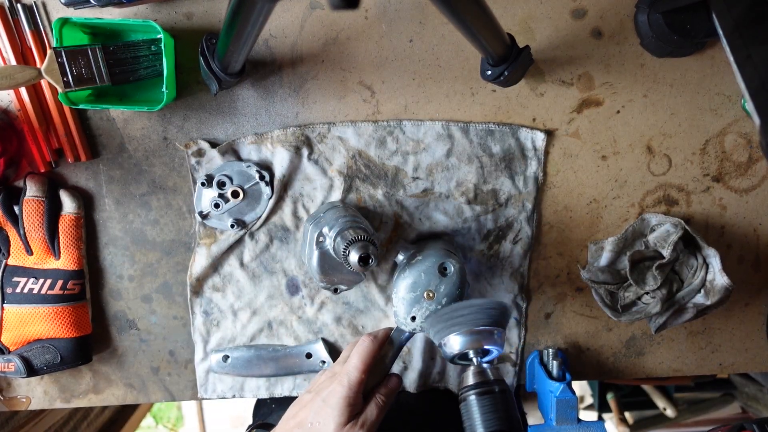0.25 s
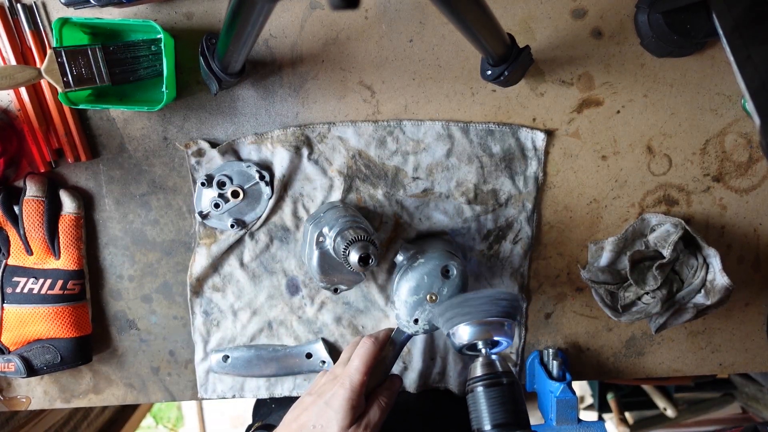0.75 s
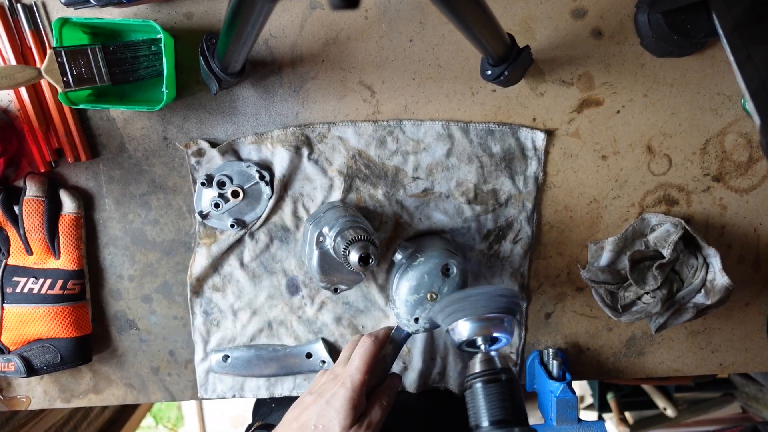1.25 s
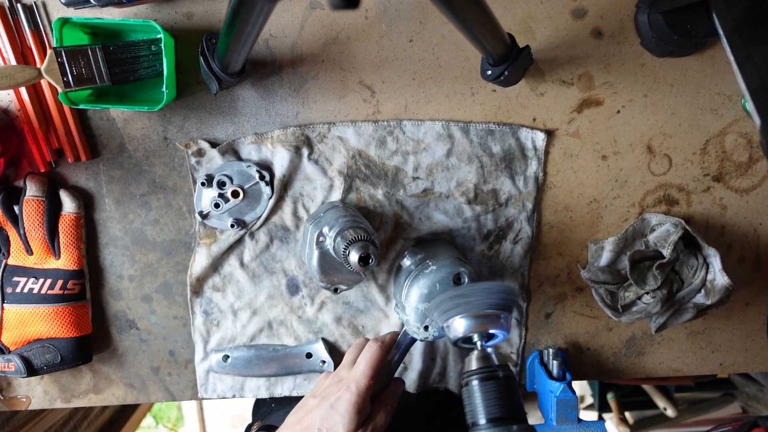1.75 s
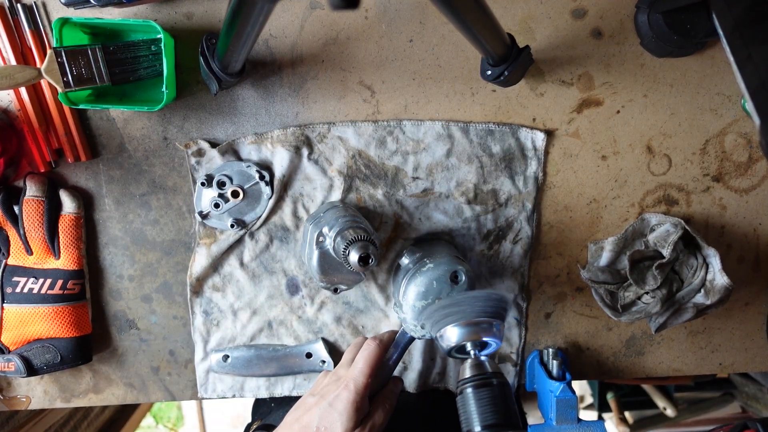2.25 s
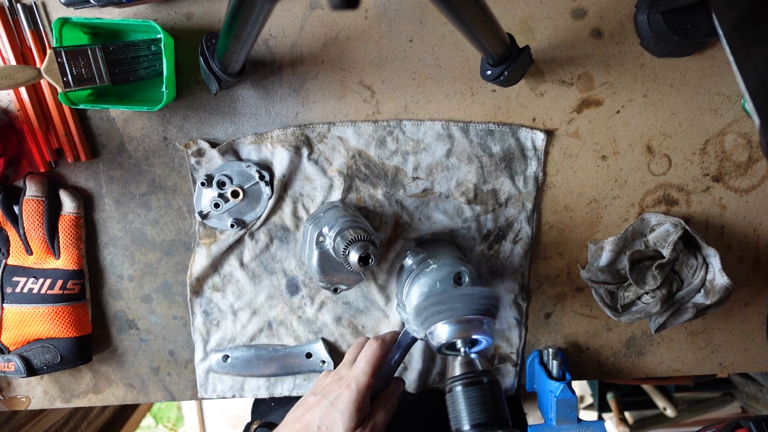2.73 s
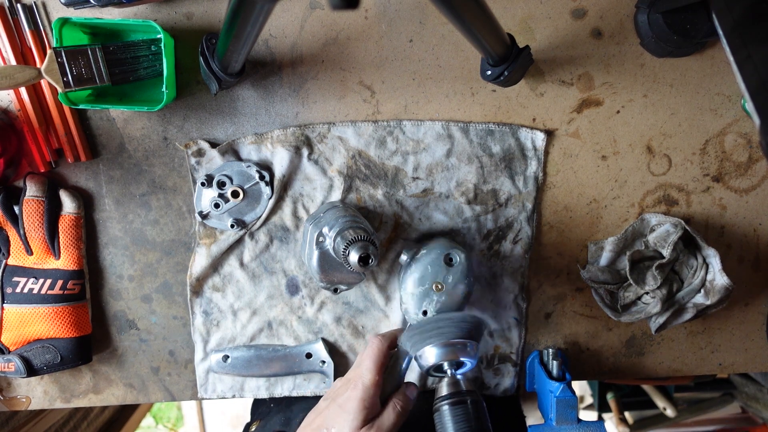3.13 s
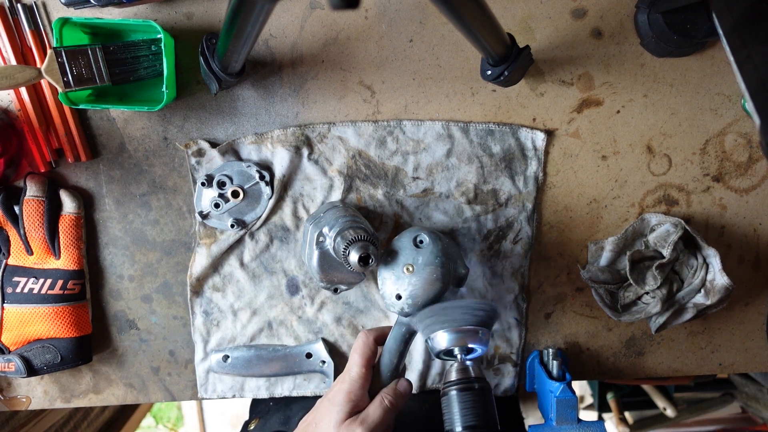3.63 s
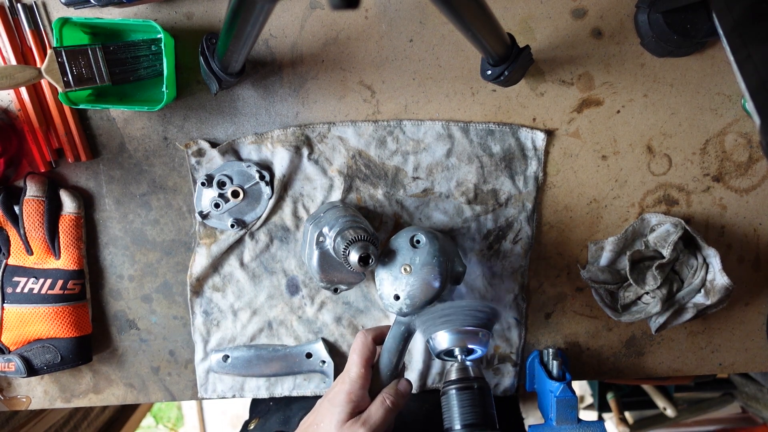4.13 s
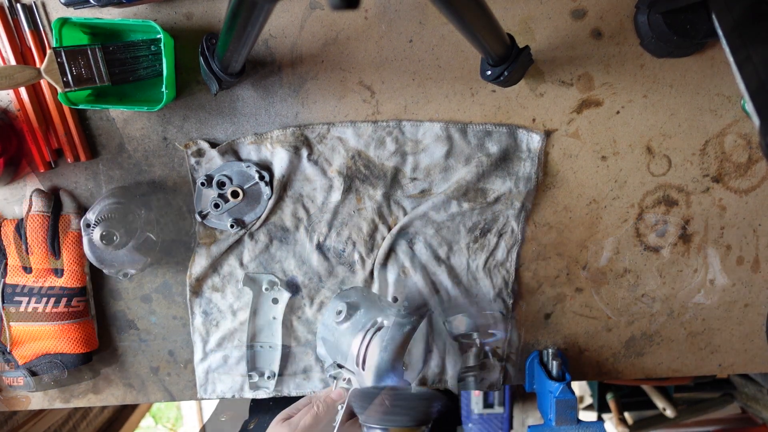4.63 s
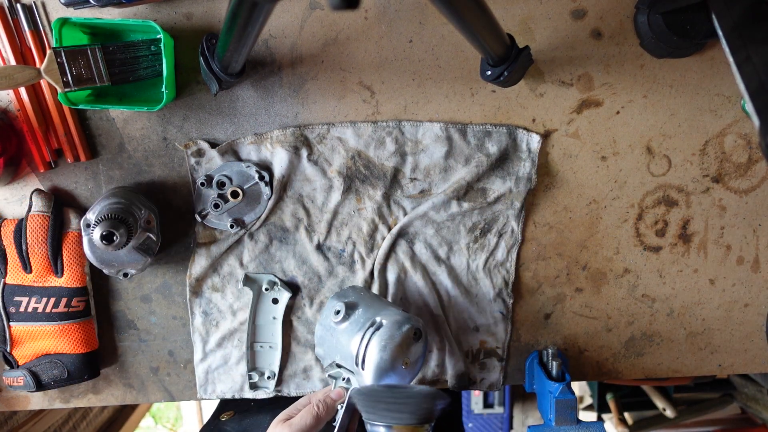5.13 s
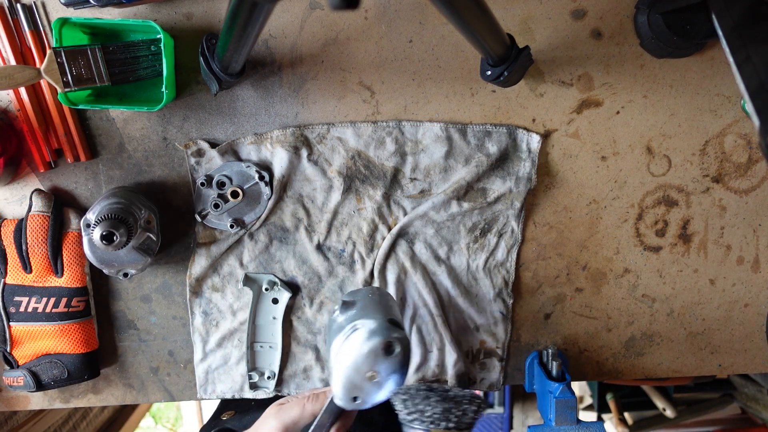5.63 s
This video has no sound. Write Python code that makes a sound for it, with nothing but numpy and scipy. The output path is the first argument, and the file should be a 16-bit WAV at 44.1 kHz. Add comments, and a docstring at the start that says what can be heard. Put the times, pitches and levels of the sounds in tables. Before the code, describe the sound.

Bright wire-brush hiss over a high drill whine, stuttering low knocks underneath, a smoother stretch, then a braked stop and near silence.

```python
"""A cordless drill spins a wire cup brush against a hand-held metal casing on a cloth-covered bench.
From the start the wires hiss, motor and gears whine, and short runs of knocks come once a brush turn.
Past four seconds a hard press makes the whine sag; then comes a cut to a stretch without knocks or rumble.
Last the trigger is let go, the brake squeals and clacks, and the hiss fades out.
Wires are filtered noise, whines and squeal are sines, and knocks are clicks that set the bench ringing."""
import sys
import numpy as np
from scipy import signal
from scipy.fft import rfft, irfft
from scipy.io import wavfile
from scipy.ndimage import uniform_filter1d

SR = 44100
rng = np.random.default_rng(int(sys.argv[2]) if len(sys.argv) > 2 else 0)


def pcm_store(signal):
    """Save signal as 16-bit PCM."""
    levels = np.round(np.clip(np.atleast_2d(signal), -1, 1) * 32767)
    wavfile.write(sys.argv[1], SR, levels.astype(np.int16).T)


N = 259308   # length in samples


def amp(db):
    """Turn a level in dB into a plain multiplier."""
    return 10 ** (np.asarray(db) / 20)


def rms_one(x):
    """Scale a sound to an average strength (rms) of 1."""
    return x / np.sqrt(np.mean(x ** 2) + 1e-20)


def seconds():
    """The time of every sample, in seconds."""
    return np.arange(N) / SR


def in_time(rows):
    """Draw each column of a table as a line over time, one value per sample."""
    s, *columns = np.transpose(rows)
    return [np.interp(seconds(), s, column) for column in columns]


def at_hz(points, hz):
    """Read a spectrum between its points, on a log-frequency axis."""
    point_hz, point_db = np.array(points)[:, 0], np.array(points)[:, 1]
    return np.interp(np.log(hz + 1), np.log(point_hz), point_db)


def drift(rate_hz):
    """Random wandering of rms 1: noise smoothed to about this rate."""
    step = 40   # samples between the random points
    r = np.exp(-2 * np.pi * rate_hz * step / SR)
    noise = rng.standard_normal(N // step + 2002)
    slow = signal.lfilter([1], [1, -2 * r, r * r], noise)[2000:]   # skip the settling
    return np.interp(np.arange(N) / step, np.arange(len(slow)), rms_one(slow))


def ring(clicks, hz, t60):
    """Each click starts a sine that dies by 60 dB in t60 seconds; a click of 1 gives height 1."""
    r, w = amp(-60 / (t60 * SR)), 2 * np.pi * hz / SR
    return signal.lfilter([0, np.sin(w)], [1, -2 * r * np.cos(w), r * r], clicks + 1e-18)


def sine(hz):
    """A sine of rms 1 whose pitch may glide."""
    return np.sqrt(2) * np.sin(2 * np.pi * np.cumsum(hz) / SR)


def high(x, hz):
    """Steeply remove everything below a frequency."""
    return signal.sosfilt(signal.butter(3, hz, "high", fs=SR, output="sos"), x)


# runs of knocks, one knock a brush turn; also read by knocks():
# (first knock [s], end [s], first level [dB], last level [dB], every second knock weaker by [dB],
#  upper over lower bench tones [dB])
KNOCK_RUNS = [(0.043, 0.11, -60, -54, 5, 0), (0.12, 0.225, -48, -55, 2, 4),
              (0.233, 0.309, -48.5, -54.5, 17, 3.5), (0.388, 0.4, -59, -63, 0, 1),
              (0.408, 0.522, -46, -59, -6.5, 4), (0.653, 0.748, -61.5, -67.5, -8, -6),
              (0.794, 0.825, -69, -52.5, -5, -4), (0.831, 1.03, -45.5, -47, -4, 4.5),
              (1.039, 1.107, -43.5, -54, 1.5, 0), (1.192, 1.26, -56, -52, 0, 0),
              (1.27, 1.355, -49, -49, 4, 1), (1.365, 1.478, -40, -52, 12, 4),
              (1.481, 1.507, -48.5, -46, 1, 0), (1.515, 1.64, -39.5, -52.5, -1.5, 4.5),
              (1.651, 1.795, -49.5, -44.5, 2, -2.5), (1.806, 1.89, -57, -52, 2, -7),
              (1.899, 1.95, -40.5, -49, 4, 3.5), (1.959, 2.005, -45.5, -50, 2, 2),
              (2.016, 2.085, -50, -49, 0, 2), (2.094, 2.2, -45, -50, -0.5, 8),
              (2.209, 2.28, -46, -50, -1, 2), (2.286, 2.355, -46.5, -52, 0, 7.5),
              (2.362, 2.43, -43, -45.5, -3, 1), (2.44, 2.565, -50, -50, -0.5, 1),
              (2.574, 2.625, -44.5, -53, -2, 0), (2.634, 2.7, -50, -53, 2.5, 8),
              (2.711, 2.87, -52.5, -57.5, -1, 2), (2.885, 2.94, -52, -59, 8, -3),
              (2.951, 3.114, -53.5, -54, 11, 4), (3.127, 3.16, -51, -62, 0, -5),
              (3.171, 3.355, -70, -60, 1.5, 1), (3.366, 3.39, -53, -68, -1, 0),
              (3.401, 3.5, -50, -58, 18, 4.5), (3.517, 3.68, -68, -65, -1.5, 0),
              (3.692, 3.78, -56, -63, -1.5, -0.5), (3.79, 3.89, -73, -60.5, -2, 6),
              (3.907, 3.97, -57, -58, -0.5, -2), (3.98, 4.1, -54, -69, 1, 4),
              (4.116, 4.16, -55, -67, -2, 0), (4.167, 4.2, -57, -60, -3, 1),
              (4.212, 4.3, -52.5, -66, 0, -1), (4.315, 4.555, -66.5, -60.5, -7.5, 1)]
IDLE_DB = -85   # pressure on the bench between runs


def pressure_db():
    """How hard the casing bears on the bench: the level of the knock runs, smoothed."""
    now, out = seconds(), np.full(N, float(IDLE_DB))
    for start, end, first_db, last_db, *_ in KNOCK_RUNS:
        inside = (now >= start) & (now < end + .02)
        out[inside] = np.interp(now[inside], [start, end], [first_db, last_db])
    return uniform_filter1d(out, size=1500)


# tone of the bench rumble, before scaling: (frequency [Hz], level per Hz [dB])
RUMBLE = [(24, -56), (40, -14), (86, -21.5), (161, -3.5), (408, -8.5), (484, 3), (600, -19.5), (780, -39.5),
          (1320, -120)]
RUMBLE_DB = -73.5   # at a pressure of -62 dB and a hiss of -35.5 dB


def rumble():
    """Low noise from the bench, rising with the knocking, nearly gone after the cut at 4.56 s."""
    spectrum = rfft(rng.standard_normal(N)) * amp(at_hz(RUMBLE, np.fft.rfftfreq(N, 1 / SR)))
    noise = rms_one(irfft(spectrum, N))
    level_db = RUMBLE_DB + 0.27 * (pressure_db() + 62) + 1.4 * drift(7.4)
    before_cut = np.clip((STRETCH_STARTS[4] - seconds()) / 0.025, .03, 1)
    follows_hiss = amp(in_time(SCRUB)[0] + 35.5)
    return noise * amp(level_db) * before_cut * follows_hiss


# falling brake squeal: (time [s], pitch [Hz], level [dB], level one octave up [dB])
SQUEAL = [(5.538, 2600, -60, -80), (5.546, 2480, -46, -56), (5.551, 2380, -39, -39),
          (5.558, 2260, -37, -46), (5.562, 2120, -46, -60), (5.568, 1930, -40, -65),
          (5.574, 1800, -60, -80)]
# sharp clacks of the chuck: (time [s], peak level [dB], pitch [Hz])
CLACKS = [(4.546, -26, 8000), (5.55, -29, 5000), (5.577, -30, 7000), (5.583, -28, 9000), (5.588, -28, 8000),
          (5.5995, -24, 6200)]
BRAKED_HUM_DB = -71.5


def brake():
    """A rough falling squeal with its octave, sharp chuck clacks, and a hum as the motor runs down."""
    silent_start, silent_end = (0.023, 2606, -150, -150), (5.6, 1800, -150, -150)
    hz, db, octave_db = in_time([silent_start] + SQUEAL + [silent_end])
    hz = hz * (1 + .025 * drift(250))   # fast random pitch makes it rough
    squeal = amp(db) * sine(hz) + amp(octave_db) * sine(2 * hz)
    squeal = squeal * amp(3 * drift(250))
    clacks = np.zeros(N)
    for s, peak_db, clack_hz in CLACKS:
        burst = rng.standard_normal(300) * np.exp(-np.arange(300) / 20)
        burst = ring(burst, clack_hz, 0.0032) + .5 * ring(burst, 0.89 * clack_hz, .003) + .8 * burst
        clacks[round(s * SR):][:300] += amp(peak_db) * burst / np.abs(burst).max()
    # the motor's own turn sounds at a quarter of the squeal's pitch
    hum_on = np.interp(seconds(), [5.514, 5.52, 5.562, 5.568], [0, 1, 1, 0])
    hum = amp(BRAKED_HUM_DB) * sine(hz / 4) * hum_on
    return high(squeal + clacks, 1200) + hum


# motor; its speed also turns the brush in scene():
# (time [s], speed [turns per s], level of the 4th, 8th and 13th multiple [dB])
MOTOR = [(0.0, 676, -51, -52, -59), (0.15, 673.3, -51, -53, -60), (0.6, 675, -51, -53, -55),
         (1.2, 674.2, -51, -52, -53), (1.62, 675, -51, -52, -49), (2.12, 672, -51, -53, -48),
         (2.4, 672.3, -52, -53, -51), (2.55, 674.6, -52, -53, -50), (3.1, 675.8, -53, -55, -53),
         (3.45, 676, -53, -55, -56), (3.75, 672.4, -55, -56, -49), (4.0, 672, -56, -57, -49),
         (4.16, 672.5, -53, -55, -46), (4.2, 637.8, -53, -57, -44), (4.23, 631, -53, -59, -43),
         (4.36, 630.8, -53, -66, -44), (4.5, 631.5, -53, -64, -46), (4.575, 680.8, -52, -60, -49),
         (4.92, 677.2, -51, -58, -48), (5.14, 673.6, -53, -61, -46), (5.3, 676, -53, -62, -45),
         (5.51, 676.5, -53, -60, -46)]
# weak whines: (multiple of the motor speed, level [dB], heard from [s], heard to [s])
FAINT_WHINES = [(1, -76, 3, 4.6), (1, -74, 4.55, 5.6), (2, -74.5, 2.5, 4.5), (3, -65.5, 3, 4.9),
                (16, -62.5, -6, 5.4), (16, -58, 1.5, 2.95)]


def whine(turns, waver, beat_depth):
    """Motor and gears: sines on multiples of the motor speed, the main ones beating once a brush turn."""
    speed, *levels = in_time(MOTOR)
    speed = speed * (1 + waver * drift(15.4))
    now = seconds()
    beat = 1 + beat_depth * np.cos(2 * np.pi * turns + 2.0)
    flutter = amp(.8 * drift(20))
    out = np.zeros(N)
    for multiple, db in zip((4, 8, 13), levels):
        out += amp(db) * flutter * sine(multiple * speed) * beat
    for multiple, db, start, end in FAINT_WHINES:
        heard = np.clip(np.minimum(now - start, end - now) / 0.066, 0, 1)   # fades in and out
        out += amp(db + 1.6 * drift(12)) * sine(round(multiple) * speed) * heard
    powered = np.clip((5.52 - now) / 0.013, 0, 1)   # the trigger is let go
    return out * powered


# tones of bench and casing under a knock: (frequency [Hz], level [dB], ring time t60 before damping [s])
BENCH = [(162, -24, 0.06), (250.5, -2.5, 0.046), (295.4, 1.5, 0.03), (480, 1, 0.06), (513.4, -1, 0.041),
         (652, -14, 0.11), (810, -10.5, .045), (1105, -5.5, .035)]
SHARPEN_PER_DB, MID_KNOCK_DB = .5, -54   # a harder knock is a shorter, brighter contact
UNEVEN_DB = 1.6   # random spread from knock to knock


def knocks(turns, uneven_db, soft_hz):
    """The off-centre brush knocks the casing on the bench once a turn; each click rings the bench tones."""
    rows = []
    for start, end, first_db, last_db, skip_db, hollow_db in KNOCK_RUNS:
        first, last = round(start * SR), round(end * SR)
        nth = np.arange(np.floor(turns[last] - turns[first]) + 1)
        at = np.searchsorted(turns, turns[first] + nth)   # sample of each whole turn
        level_db = np.interp(at, [first, at[-1] + 1], [first_db, last_db]) - skip_db * (nth % 2)
        rows += zip(at, level_db, nth * 0 + hollow_db)
    at, level_db, hollow_db = np.transpose(rows)
    at = at.astype(int)
    late = rng.integers(0, 40, N)[at]   # contact comes up to 39 samples late
    strength_db = level_db + rng.normal(0, uneven_db, N)[at]
    chance_db = rng.normal(0, UNEVEN_DB, (N, len(BENCH)))[at]   # separate for each tone
    edge_hz = soft_hz * amp(SHARPEN_PER_DB * (strength_db - MID_KNOCK_DB))
    out = np.zeros(N)
    for k, (hz, db, t60) in enumerate(BENCH):
        tilt = .5 if hz > 400 else -.5   # a hollow knock favours the upper tones
        clicks = np.zeros(N)
        click_db = strength_db + tilt * hollow_db + chance_db[:, k]
        clicks[at + late] = amp(click_db) / (1 + (hz / edge_hz) ** 2)
        damped_t60 = min(t60, .08)   # the cloth damps long ringing
        out += amp(db) * ring(clicks, hz, damped_t60) * (-1) ** k   # neighbours start in opposite directions
    return high(out, 170)


# wires on metal; also read by rumble(): (time [s], level [dB])
SCRUB = [(0, -34), (2.65, -35.5), (4.53, -34.5), (4.58, -34.5), (5.53, -34.5), (5.6, -35), (5.62, -48),
         (5.64, -71.5), (5.67, -87), (5.78, -94), (5.88, -98.5)]
# five stretches of scrubbing, some joined by cuts, each with its own hiss tone,
# then the last hiss as it fades out; also read by rumble(): (start [s])
STRETCH_STARTS = (0, .56, 2.95, 3.55, 4.56, 5.635)
# tone of the hiss in each stretch, before scaling: (frequency [Hz], level per Hz [dB])
STRETCH_COLOURS = [
    [(350, -57.5), (600, -28.5), (669, -20.5), (1200, -7), (1460, -8), (1630, -5), (2550, -5), (2700, -4.5),
     (2930, -3.5), (4290, -7), (5340, -4.5), (9470, -0.5), (11500, 1), (15700, -0.5)],
    [(350, -50.5), (600, -19), (942, -18), (1090, -11), (2380, -6), (2550, -8.5), (2730, -5.5),
     (2930, -6.5), (3690, -6.5), (4230, -9), (5340, -6), (6820, -5.5), (11800, 0.5), (15700, -3.5)],
    [(350, -56), (600, -23), (929, -15), (1060, -8), (2550, -5.5), (2730, -1.5), (2930, -5), (3740, -3.5),
     (4230, -6), (5340, -5), (7010, -3.5), (11600, 2), (14700, -1.5), (15700, -4.5)],
    [(350, -64), (600, -26), (916, -19.5), (1090, -12), (1600, -10.5), (1920, -12.5), (2590, -7),
     (4720, -11), (6370, -8), (7720, -7), (8490, -2), (9340, -6.5), (12300, -2), (15700, -7)],
    [(120, -90), (200, -58), (632, -27.5), (667, -26), (961, -22.5), (1310, -9), (1520, -16.5), (2150, -8),
     (2620, -8), (3090, -10.5), (7160, -8.5), (9080, -6), (9590, -8), (13300, -5), (15700, -4)],
    [(120, -33), (200, -4), (1520, 5), (1600, 0), (1850, 2), (2190, 1), (2930, -1), (15700, -5)],
]
# two bands lifted in each stretch: (frequency [Hz], width [Hz], lift [dB])
STRETCH_BRIGHT = [
    [(11500, 900, 3.5), (13000, 520, 3.5)],
    [(10600, 560, 1.5), (15000, 800, 1.5)],
    [(13900, 3800, 3.5), (11400, 900, 1)],
    [(12150, 1400, 3.5), (9940, 380, 4)],
    [(13100, 1300, 3.5), (10740, 500, 3)],
    [(2500, 1600, 3), (9050, 1800, 1.5)],
]
# ringing of casing and cup under the wires: (frequency [Hz], width [Hz], level over the hiss [dB])
CASING = [(1078, 72, 4), (1332, 62, 3), (1631, 25, 5.5), (2000, 87, -1), (2390, 130, 6), (2800, 60, 3),
          (2910, 80, 5), (3250, 120, 6), (3600, 90, 7), (3830, 110, 6), (4040, 80, 4.5), (4490, 90, 5),
          (4780, 200, 5), (5230, 120, 5), (5500, 100, 3.5), (5940, 240, 6), (6326, 220, 5), (6590, 160, 4),
          (7600, 200, 2.5), (10300, 180, 2.5), (11230, 93, 2.5)]
# tone of the reflected hiss, before scaling: (frequency [Hz], level per Hz [dB])
SIDE_COLOUR = [(300, -60.5), (600, -40.5), (1120, -39), (1900, -13.5), (2450, -2), (3500, -2), (4060, -2),
               (4440, -7), (8460, 3.5), (9240, 3), (11900, 3.5), (15700, 1.5)]
SIDE_DB = -13   # reflected hiss against the level in SCRUB
BODY_HZ, BODY_FOLLOWS = 1600, .12   # the hiss below this swells with the pressure, dB per dB


def wires(turns, grain_db, wobble_db):
    """Dense uneven scratches, pressed harder once a turn, ring the casing; gives direct and reflected hiss."""
    uneven_db = grain_db * drift(300) + 0.28 * drift(5.2) + 0.49 * drift(11)
    angle = 2 * np.pi * turns
    press = np.cos(angle) + .6 * np.cos(2 * angle) + 0.54 * np.cos(3 * angle)
    scratches = rng.standard_normal((2, N)) * amp(uneven_db) * amp(wobble_db * press)
    hz = np.fft.rfftfreq(N, 1 / SR)
    rings_db = sum(db / (1 + (2 * (hz - f) / width) ** 2) for f, width, db in CASING)
    direct, reflected = rfft(scratches) * amp([rings_db, .5 * rings_db + at_hz(SIDE_COLOUR, hz)])

    stretch = np.searchsorted(STRETCH_STARTS, seconds(), "right") - 1
    out = np.zeros(N)
    for k, (colour, bands) in enumerate(zip(STRETCH_COLOURS, STRETCH_BRIGHT)):
        lift_db = sum(db * np.exp(-(2 * (hz - f) / width) ** 4) for f, width, db in bands)
        heard = rms_one(irfft(direct * amp(at_hz(colour, hz) + lift_db), N))
        # a short crossfade joins the stretches
        out += heard * uniform_filter1d((stretch == k) * 1., size=900, mode="nearest")

    body = signal.sosfilt(signal.butter(2, BODY_HZ, fs=SR, output="sos"), out)
    before_cut = seconds() < STRETCH_STARTS[4]   # the body follows the pressure until that cut
    out += body * (amp(BODY_FOLLOWS * (pressure_db() + 58) * before_cut) - 1)
    level = amp(in_time(SCRUB)[0])
    return out * level, rms_one(irfft(reflected, N)) * level * amp(SIDE_DB)


# sideways lean of the treble: (time [s], left minus right [dB])
LEAN = [(0.0, 1.0), (1.56, 1.0), (4.41, 0.5), (4.96, -0.5), (5.6, -0.5)]
GEAR_RATIO = 12.94   # motor turns per brush turn
FIRST_TURN = -0.42   # where in its turn the brush starts, in turns


def scene():
    """All sources sit close to the middle in stereo, the treble hiss leaning a little to one side."""
    turns = FIRST_TURN + np.cumsum(in_time(MOTOR)[0]) / GEAR_RATIO / SR
    hiss, side = wires(turns, grain_db=0.9, wobble_db=0.43)
    drill = whine(turns, waver=.0005, beat_depth=.3) + brake()
    bench = knocks(turns, uneven_db=UNEVEN_DB, soft_hz=1100)
    # side is added on the left and taken away on the right
    side = side + high(hiss, 3500) * np.tanh(in_time(LEAN)[0] * np.log(10) / 40)
    side = side + amp(-21.5) * high(np.roll(drill, 1), 6000)   # one sample later
    side = side + amp(-26.0) * high(drill, 1500) + amp(-35) * high(bench, 400)
    return hiss + drill + bench + rumble() + side * [[1], [-1]]


CUTOFF_HZ = 15740


def record(dry):
    """A steep low-pass filter cuts off the top of the treble."""
    return signal.sosfilt(signal.ellip(14, .3, 75, CUTOFF_HZ, fs=SR, output="sos"), dry)


dry = scene()
out = record(dry)
pcm_store(out)
```